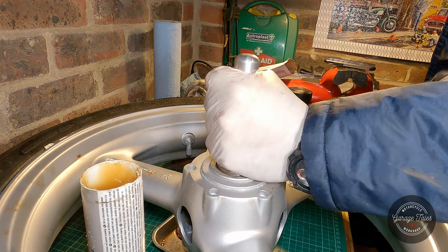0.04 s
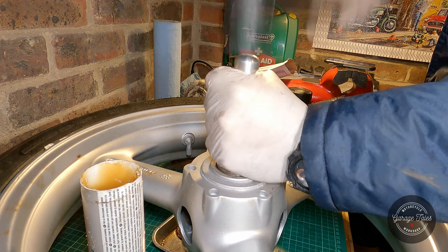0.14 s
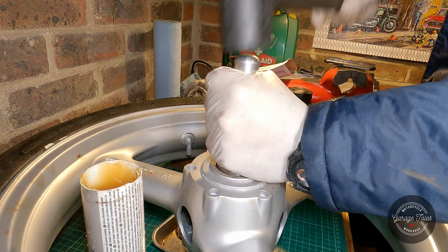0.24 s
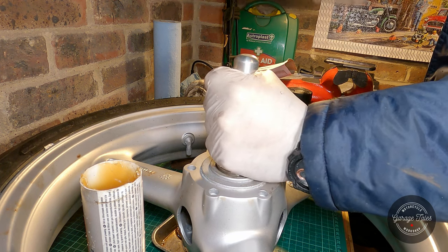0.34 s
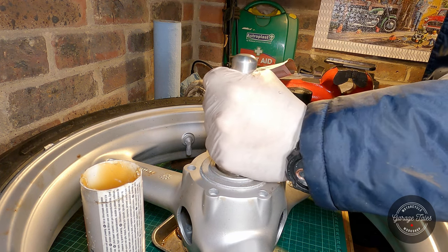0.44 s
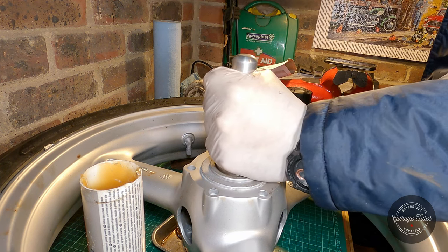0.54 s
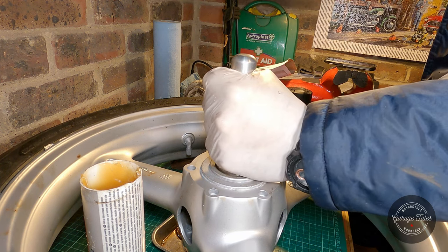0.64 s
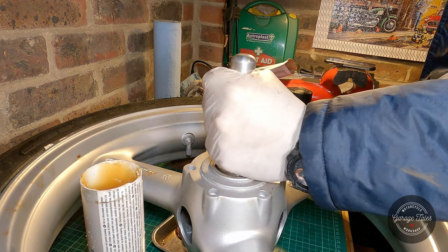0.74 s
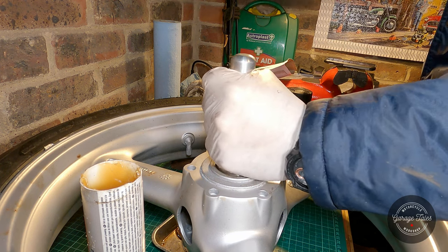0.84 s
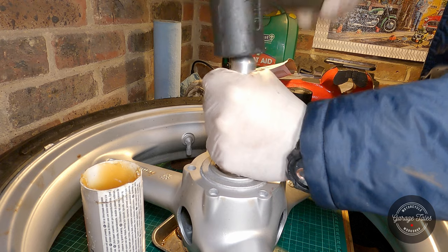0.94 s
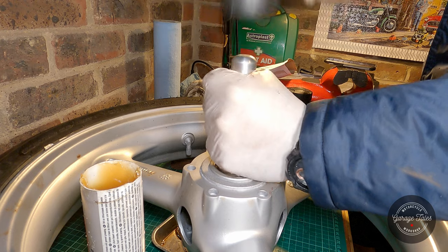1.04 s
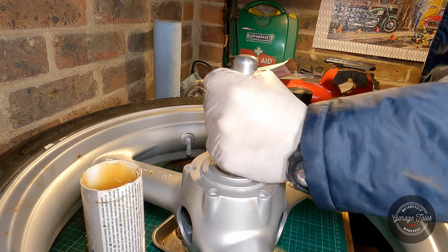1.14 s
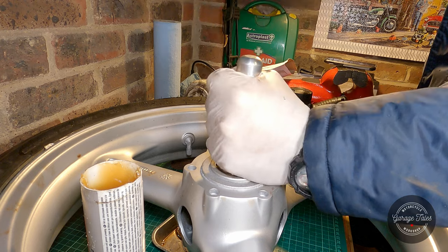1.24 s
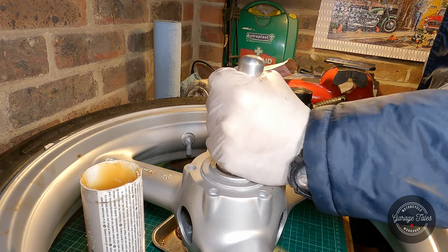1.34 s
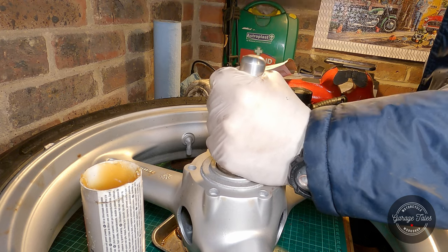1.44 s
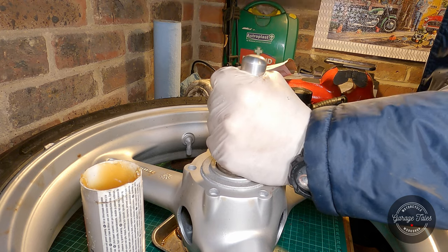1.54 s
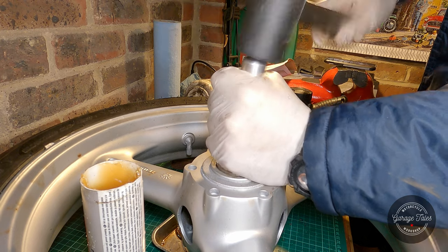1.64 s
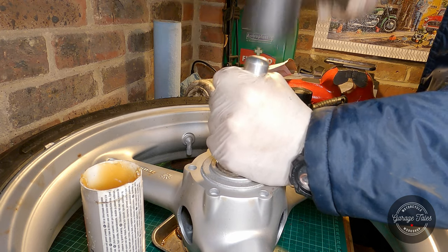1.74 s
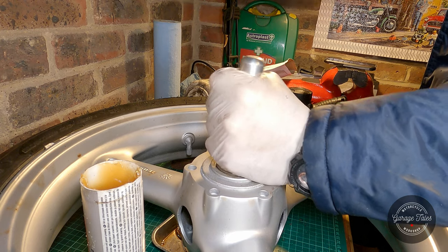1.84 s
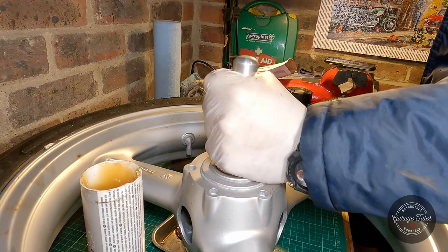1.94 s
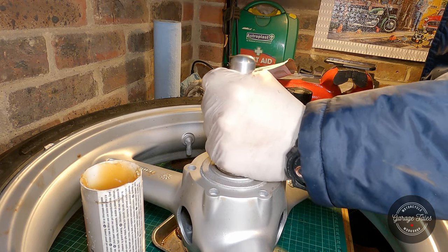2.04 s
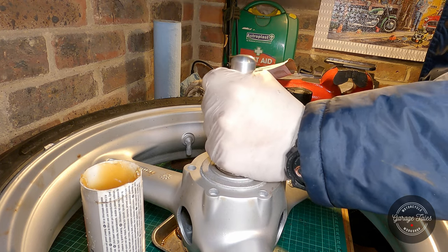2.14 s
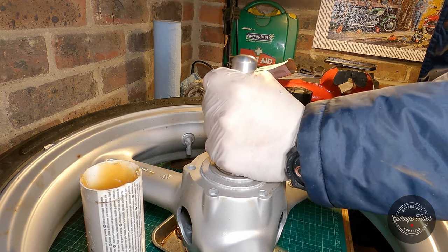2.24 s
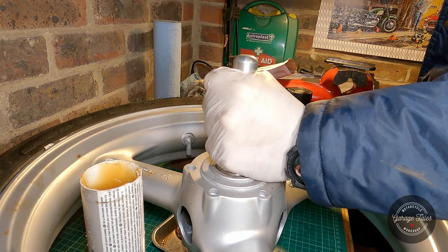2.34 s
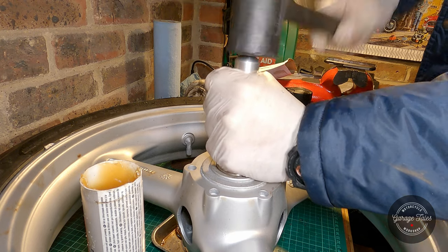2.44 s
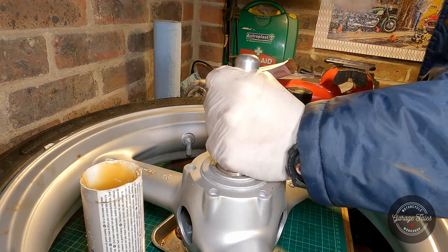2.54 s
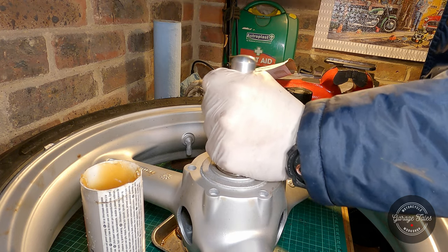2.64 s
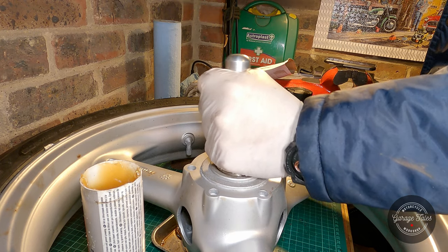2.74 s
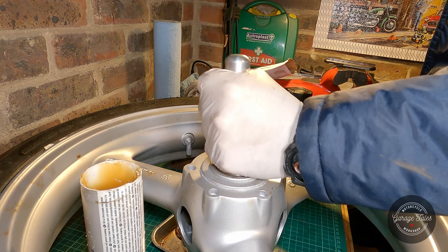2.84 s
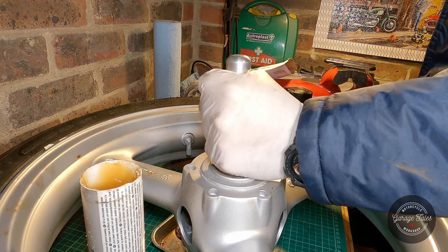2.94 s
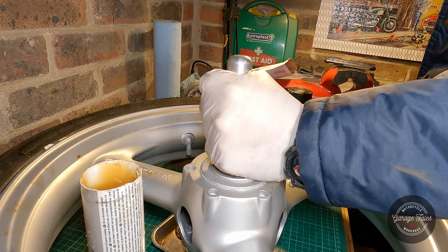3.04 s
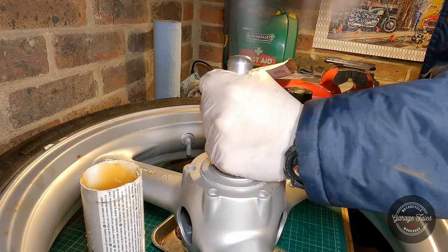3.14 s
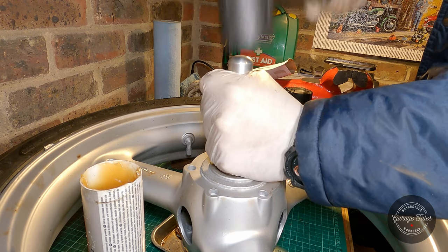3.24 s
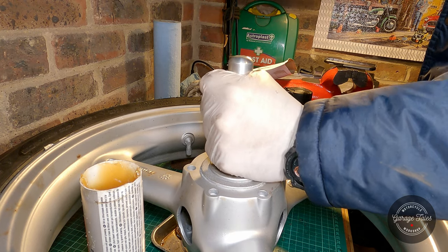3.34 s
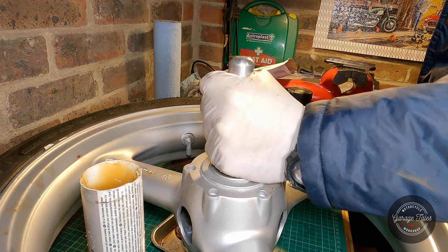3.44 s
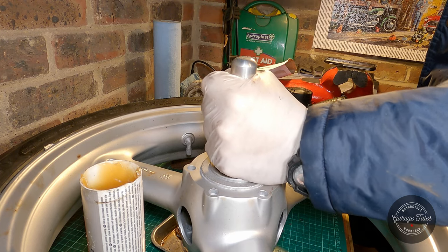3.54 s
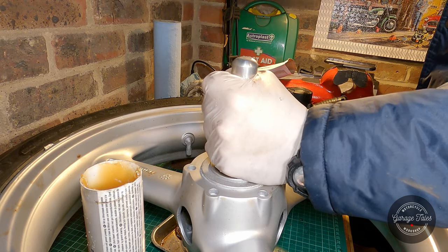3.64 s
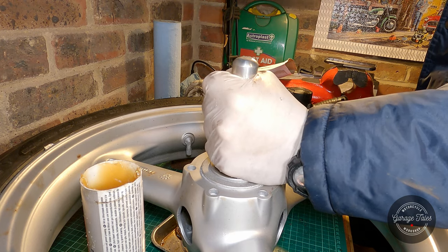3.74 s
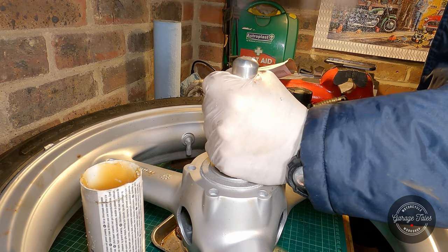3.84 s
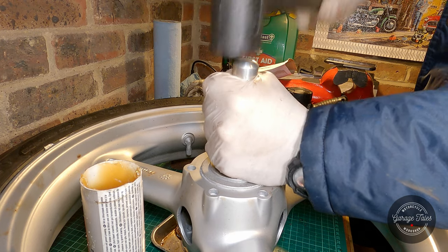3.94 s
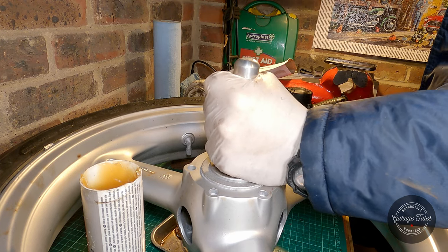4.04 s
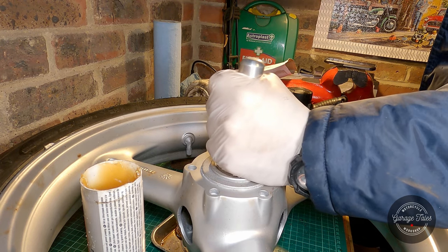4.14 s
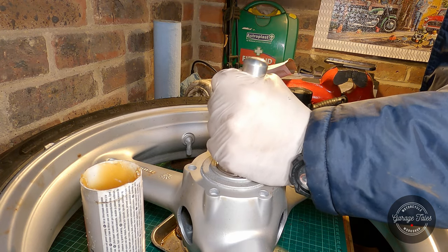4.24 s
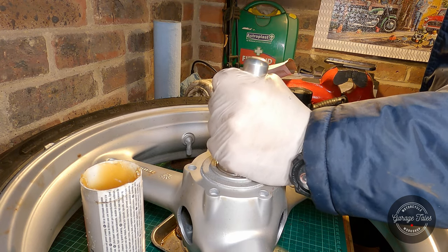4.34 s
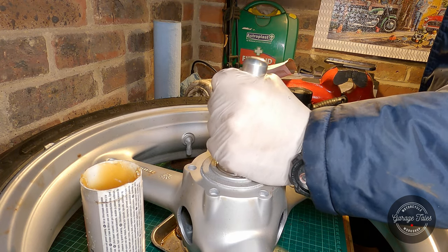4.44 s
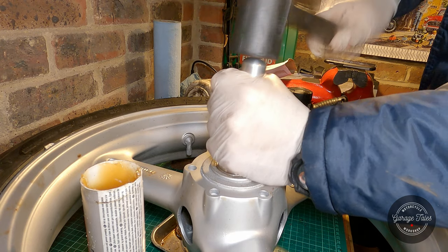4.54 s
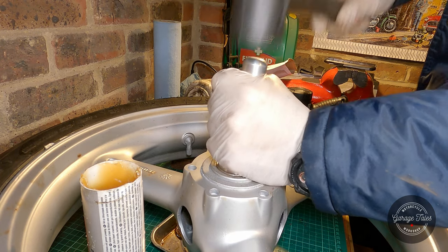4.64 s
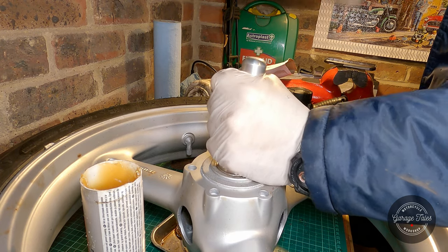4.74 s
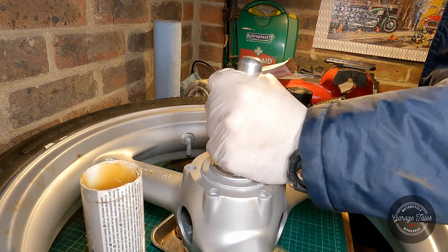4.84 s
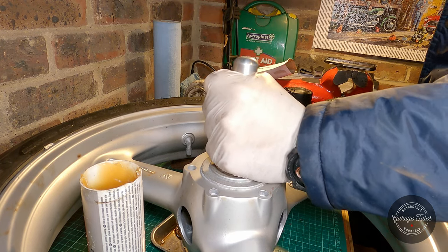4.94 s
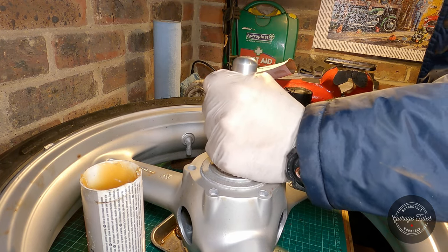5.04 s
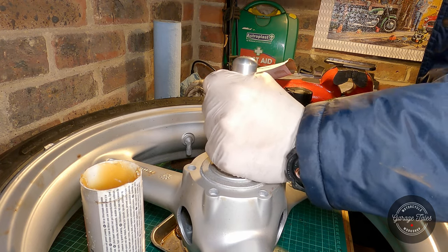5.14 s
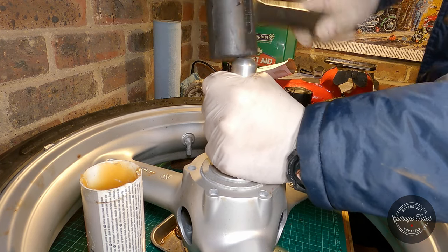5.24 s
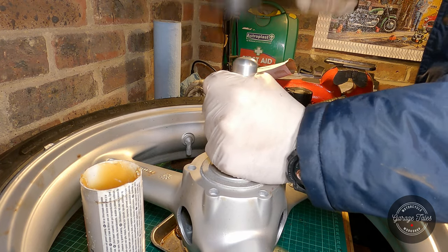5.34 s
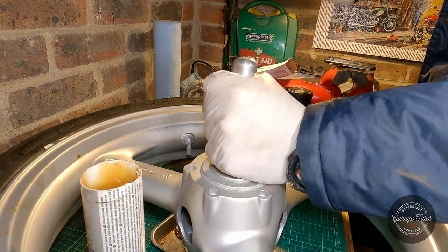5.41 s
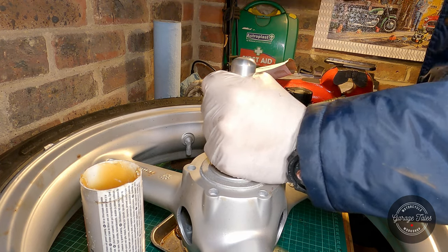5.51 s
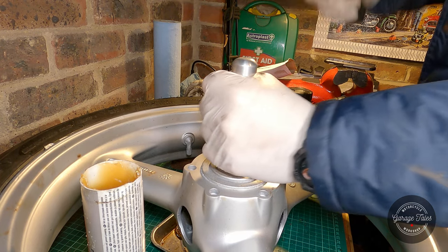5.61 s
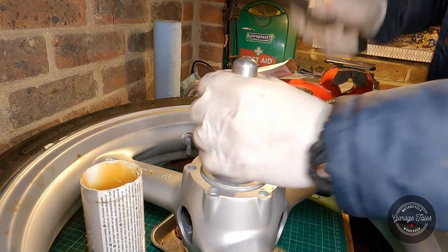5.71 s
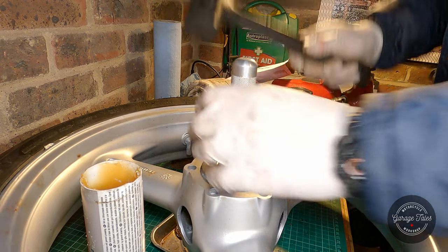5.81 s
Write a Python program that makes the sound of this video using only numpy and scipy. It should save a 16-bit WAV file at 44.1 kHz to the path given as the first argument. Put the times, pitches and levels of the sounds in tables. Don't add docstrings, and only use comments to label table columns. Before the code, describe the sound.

In a small brick garage, a mallet hits a steel driver over a wheel hub eight times, about three-quarters of a second apart. Each blow is a sharp crack with a hard knock, low bench thump, slight rim ring and short room echo. A nylon sleeve swishes before and after the blows, small parts tick, and a faint machine hums. The close, almost mono microphone clips the peaks; at the end only rustling and light ticks remain.

```python
import sys
import numpy as np
from scipy import signal
from scipy.fft import rfft, irfft
from scipy.io import wavfile
from scipy.ndimage import uniform_filter1d

SR = 44100
rng = np.random.default_rng(int(sys.argv[2]) if len(sys.argv) > 2 else 0)


def invert_db(level):
    return 10 ** (np.asarray(level, dtype=float) / 20)


def wav_record(signal):
    frames = np.transpose(np.atleast_2d(signal))
    bounded = np.clip(frames, -1, 1)
    quanta = np.round(bounded * 32767).astype(np.int16)
    wavfile.write(sys.argv[1], SR, quanta)


N = 258901


def unit(x):
    return x / np.sqrt(np.mean(x ** 2) + 1e-20)


def along(points, hz):
    f, v = np.transpose(points)
    return np.interp(np.log(hz + 1), np.log(f + 1), v)


def coloured(x, spectrum):
    slit_hz, slit_half_hz = 9080, 120
    hz = np.fft.rfftfreq(len(x), 1 / SR)
    inside = (hz > spectrum[0][0] / 2) & (hz < spectrum[-1][0] + 400)
    inside = inside & (np.abs(hz - slit_hz) > slit_half_hz)
    return irfft(rfft(x) * invert_db(along(spectrum, hz)) * inside, len(x))


def hiss(size, spectrum):
    return unit(coloured(rng.standard_normal(size), spectrum))


def ring(modes, t, attack, scatter_db, phase):
    tones = np.zeros(len(t))
    for hz, db, t60 in modes:
        level, shift, turn = rng.standard_normal(3)
        pitch = hz * (1 + 0.0028 * shift * scatter_db)
        fade = invert_db(db + scatter_db * level - 60 * t / t60)
        tones += fade * np.sin(2 * np.pi * pitch * t + phase * turn)
    return tones * (1 - np.exp(-t / attack))


def add(track, s, sound):
    part = track[round(s * SR):][:len(sound)]
    part += sound[:len(part)]


# (pitch [Hz], level per Hz [dB])
AIR_COLOUR = [(25, -24), (45, -24.5), (80, -9.5), (125, -16.5), (155, 4), (182, -11), (208, -2), (250, -17),
              (390, -13.5), (450, -20.5), (580, -12), (720, -20.5), (900, -25.5), (1500, -21.5),
              (9000, -48.5)]


def air():
    return invert_db(-65.5) * hiss(N, AIR_COLOUR)


# (pitch [Hz], level [dB])
MACHINE_TONES = [
    (154, -74),
    (208, -72),
]


def hum():
    t = np.arange(N) / SR
    out = np.zeros(N)
    for hz, db in MACHINE_TONES:
        drift = np.interp(6 * t, np.arange(40), rng.standard_normal(40))
        out += invert_db(db + 2.1 * drift) * np.sin(2 * np.pi * hz * t)
    return out


# (time [s], peak level [dB], pitch [Hz], time to fade 60 dB [s], overtone [dB])
PART_TICKS = [(0.034, -43, 1593, 0.032, -13), (0.098, -54, 1790, 0.03, 0), (0.438, -41, 1248, 0.058, -8),
              (1.244, -42.5, 3220, 0.048, -7), (1.308, -45.5, 1205, 0.03, -9),
              (1.338, -42.5, 920, 0.025, -6), (1.452, -39, 1250, 0.045, -19),
              (2.004, -45, 880, 0.029, -9.5), (2.741, -46.5, 1186, 0.04, -8.5),
              (3.533, -48, 1120, 0.057, -8), (5.698, -51.5, 1210, .04, -14), (5.792, -45, 1220, 0.02, -8),
              (5.795, -46, 625, 0.06, -17), (5.804, -43.5, 1323, 0.036, -13),
              (0.034, -43.5, 3220, 0.02, -17), (0.034, -46, 552, 0.044, -12),
              (1.245, -46, 4290, 0.048, -23.5), (1.245, -52, 2405, 0.027, -6),
              (5.858, -42.5, 991, 0.05, -7)]


def ticks():
    out, t = np.zeros(N), np.arange(4096) / SR
    for s, db, hz, t60, over_db in PART_TICKS:
        colour = [(hz / 3, -20), (hz, -2), (hz, over_db - 18), (hz * 1.54, over_db), (hz * 2.5, over_db - 28)]
        body = invert_db(-1) * hiss(len(t), colour) + invert_db(-3) * np.sin(2 * np.pi * hz * t)
        fade = invert_db(db - 4.5 - 60 * t / max(t60, .005))
        add(out, s - .0007, fade * body * (1 - np.exp(-t / 0.00034)))
    return out


# (pitch [Hz], level per Hz [dB])
NYLON_COLOUR = [(240, -42), (400, -8.5), (656, -11.5), (738, -14.5), (1080, 0.5), (1720, -2), (2380, 0),
                (3220, -0.5), (6850, -9.5), (8900, -21.5), (10200, -36), (19800, -120)]
# (pitch [Hz], level per Hz [dB])
CRISP_COLOUR = [(9100, -20), (9700, -11), (11600, 4), (12700, -6.5), (13200, -27.5)]
# (time [s], peak level [dB], length [s])
CUFF_FLICKS = [
    (1.7067, -39, 0.013),
    (2.46, -39, 0.014),
    (3.22, -35.5, 0.01587),
    (3.947, -35.5, 0.014),
]


def cuff():
    out, t = np.zeros(N), np.arange(4096) / SR
    brighter = [(hz, level + 4 * np.log2(hz / 3000)) for hz, level in NYLON_COLOUR[:-1]]
    for s, db, length in CUFF_FLICKS:
        cloth = hiss(len(t), brighter) + invert_db(-11.5) * hiss(len(t), CRISP_COLOUR)
        fade = invert_db(db - 13.5 - 60 * np.clip(t - length, 0, None) / 0.026)
        add(out, s - .0007, fade * cloth * (1 - np.exp(-t / 0.00062)))
    return out


def patchy(x, depth_db):
    z = signal.stft(x, nperseg=256)[2]
    field = uniform_filter1d(rng.standard_normal(z.shape), size=4, axis=0)
    field = uniform_filter1d(field, size=7, axis=1)
    return signal.istft(z * invert_db(depth_db * unit(field)), nperseg=256)[1][:len(x)]


def peak(t, db, rise_db_per_s, fall_db_per_s):
    return invert_db(2 * (db + np.minimum(rise_db_per_s * t, -fall_db_per_s * t)))


STRIKE_TIMES = [
    .2892,
    1.0179,
    1.7722,
    2.5314,
    3.2957,
    4.0097,
    4.6779,
    5.3463,
]
# (start before the blow [s], fastest before the blow [s], arm [dB], swish [dB])
ARM_DOWNSWINGS = [
    (0.24, .077, -53, -56),
    (0.21, 0.085, -57, -70.5),
    (0.262, .059, -60.5, -47.5),
    (0.26, .057, -56.5, -46.5),
    (0.25, 0.054, -58, -48),
    (0.23, 0.063, -56.5, -53),
    (0.26, .074, -58, -51.5),
    (.15, .091, -60.5, -57.5),
]
# (recoil [dB], recoil peak after [s], recoil fade by 60 dB [s], lift [dB], lift length [s])
ARM_LIFTS = [
    (-48, 0.049, 0.32, -66.5, .55),
    (-42, 0.056, 0.27, -66, 0.59),
    (-42, 0.055, .3, -66.5, 0.52),
    (-44.5, .05, 0.33, -65.5, .55),
    (-44, .055, .3, -66, 0.512),
    (-43.5, .062, 0.23, -65, 0.42),
    (-45.5, .048, 0.37, -69.5, 0.45),
    (-52.5, 0.072, .33, -73.5, .31),
]
# (time [s], rustle [dB], time to fade 60 dB [s])
HAND_SHIFTS = [
    (.02, -63, 0.47),
    (.443, -62.5, 0.25),
    (1.25, -60, 0.061),
    (4.19, -64, 0.32),
    (5.699, -64.5, 0.99),
    (5.868, -57.5, .5),
]


def arm():
    still_db = -83
    lift_start_s, lift_rise_s, lift_fade_s = .12, 0.09, 0.084
    recoil_crisp_db, recoil_dulls_db_per_s = -19, 39.5
    t = np.arange(0, N, 32) / SR
    swing, swish, lift, recoil, recoil_crisp, shift = np.zeros((6, len(t)))
    for s, down, up in zip(STRIKE_TIMES, ARM_DOWNSWINGS, ARM_LIFTS):
        start, fastest, arm_db, swish_db = down
        recoil_db, top, t60, lift_db, length = up
        climb = (arm_db - still_db) / max(start - fastest, .01)
        swing += peak(t - s + fastest, arm_db, climb, 89)
        swish += peak(t - s + fastest, swish_db, 500, 547.5)
        after = np.clip(t - s, 0, None)
        recoil += (t > s) * peak(after - top, recoil_db, 200.5, 60 / t60)
        dulling = (60 / t60 + recoil_dulls_db_per_s) * (after - top)
        recoil_crisp += (t > s) * invert_db(2 * (recoil_db + recoil_crisp_db - dulling))
        rising = np.clip((after - lift_start_s) / lift_rise_s, 0, 1) ** 2
        fading = np.clip(after - length + lift_fade_s, 0, None) / lift_fade_s
        lift += rising * invert_db(2 * (lift_db - 12 * (after - 0.18) - 12.5 * fading))
    for s, db, t60 in HAND_SHIFTS:
        shift += peak(t - s, db, 180.5, 60 / t60)
    still = np.full(len(t), invert_db(2 * still_db))
    moves = np.array([swing, swish, lift, shift, still])
    crisp_share = invert_db(2 * np.array([-13.5, -10, -13, -21.5, -14]))
    rustle_power = moves.sum(axis=0) + recoil
    crisp_power = crisp_share @ moves + recoil_crisp
    return [np.interp(np.arange(N) / SR, t, np.sqrt(power)) for power in (rustle_power, crisp_power)]


def sleeve():
    rustle, crispness = arm()
    grain_db = unit(uniform_filter1d(rng.standard_normal(N), size=120))
    rub = invert_db(grain_db) * rng.standard_normal((2, N))
    weave = unit(coloured(patchy(rub[0], depth_db=2), NYLON_COLOUR))
    crisp = unit(coloured(patchy(rub[1], depth_db=3), CRISP_COLOUR))
    return invert_db(0.5) * rustle * weave + crispness * crisp


# (pitch [Hz], level per Hz [dB])
LEAK_COLOUR = [(200, -30), (420, -3.5), (600, -4), (900, -5.5), (1300, -14.5), (2500, -29.5), (3900, -30.5),
               (4400, -17), (4900, -31.5), (8200, -37), (8900, -31.5), (9400, -53.5)]


def leak(t):
    steps = np.floor(t * SR / 512) * 512 / SR
    fall = uniform_filter1d(invert_db(-24 * steps / .04 - 24 * t / .04), size=40)
    return (fall * hiss(len(t), LEAK_COLOUR))[::-1]


# (pitch [Hz], level per Hz [dB])
ECHO_COLOUR = [(40, -32), (80, -2.5), (200, 3), (330, -5), (420, -5), (600, -6.5), (700, -13), (790, -18.5),
               (1500, -22), (3000, -20.5), (6000, -30.5), (9000, -50.5), (11500, -46.5), (12800, -55.5)]
# (pitch [Hz], time to fade 60 dB [s])
GARAGE_FADE = [(60, 0.3), (150, 0.49), (400, 0.52), (650, 0.51), (850, 0.44), (3000, 0.34), (8000, 0.26)]


def echo(t):
    hz, when, z = signal.stft(hiss(len(t), ECHO_COLOUR), SR, nperseg=1024)
    fade = invert_db(-60 * when / along(GARAGE_FADE, hz)[:, None])
    tail = signal.istft(z * fade, SR, nperseg=1024)[1][:len(t)]
    return invert_db(-18.5) * tail * (1 - np.exp(-t / 0.009))


# (pitch [Hz], level [dB], time to fade 60 dB [s])
BENCH_TONES = [(57, -11.5, 0.72), (79.5, 3, 0.37), (124.3, -7.5, 0.52), (153.4, -3.5, 0.48),
               (176.4, 0.5, 0.22), (203.6, -7, 0.16), (247, 0, .28), (305, -4, 0.29)]


def bench(t):
    return invert_db(-21) * ring(BENCH_TONES, t, 0.0073, scatter_db=1.5, phase=3)


# (pitch [Hz], level [dB], time to fade 60 dB [s])
RIM_TONES = [(2250, -2, 0.4), (2250, 0, .16), (1177, -15.5, .3), (3545, -19.5, 0.14), (4430, -20.5, 0.14),
             (5150, -23, 0.067)]


def rim(t, db, ring_db):
    tone = invert_db(ring_db - 26) * ring(RIM_TONES, t, 0.003, scatter_db=0, phase=.1)
    note_db = db + ring_db - 29 - 60 * t / RIM_TONES[0][2]
    faded = invert_db(-64) / invert_db(note_db)
    return tone / (1 + faded ** 4)


# (time [s], level [dB], time to fade 60 dB [s])
RIM_NUDGES = [
    (5.794, -55.5, 0.14),
    (5.858, -60, 0.11),
]


def nudges():
    out, t = np.zeros(N), np.arange(4096) / SR
    for s, db, t60 in RIM_NUDGES:
        add(out, s, invert_db(db) * ring([(RIM_TONES[0][0], 0, t60)], t, 0.00091, scatter_db=3.5, phase=1))
    return out


# (pitch [Hz], level [dB], time to fade 60 dB [s])
HUB_TONES = [(414.3, -4.5, 0.11), (551, -0.5, .08), (618, 0.5, 0.061), (647, -7, .05), (872, -11.5, 0.049)]


def hub(t):
    return invert_db(-9) * ring(HUB_TONES, t, 0.00044, scatter_db=2.5, phase=1.3)


# (pitch [Hz], level [dB], time to fade 60 dB [s])
DRIVER_TONES = [(1038, -5.5, 0.039), (1250, -1.5, 0.036), (1533, -5, 0.027), (1700, -5, .015),
                (2493, -2, 0.021), (3500, -8, 0.015), (4440, -2.5, .018), (4980, -8.5, 0.021),
                (6970, -16, .014)]
# (pitch [Hz], level per Hz [dB])
CRACK_COLOUR = [(180, -33), (400, -6.5), (900, 3), (1500, -4.5), (2400, -2.5), (3000, -6), (4300, -2.5),
                (6500, -17), (8500, -25.5), (11500, -24), (13200, -28.5), (16000, -37)]


def driver(t, shank_db, shoulder_db, tip_db, edge_db):
    weight = [(1250, shank_db), (2100, shoulder_db), (4400, tip_db), (11000, edge_db)]
    modes = [(hz, db + along(weight, hz), t60) for hz, db, t60 in DRIVER_TONES]
    colour = [(hz, db + along(weight, hz)) for hz, db in CRACK_COLOUR]
    contact_s = .0025
    pressed = invert_db(-6 * t / contact_s - 40 * np.clip(t / contact_s - 1, 0, None))
    crack = invert_db(-4.5) * pressed * hiss(len(t), colour)
    chatter = invert_db(-11.5 - 60 * t / 0.047) * hiss(len(t), colour[:-2] + [(12800, -51.5)])
    grip = 0.36 + 0.55 * pressed
    steel = invert_db(10) * grip * ring(modes, t, 0.000078, scatter_db=1.05, phase=1.5)
    return steel + crack + chatter


# (strength [dB], hub knock [dB], bench thump [dB], rim ring [dB], early leak [dB])
MALLET_BLOWS = [
    (-5.5, -0.9, -2, -7, -1.5),
    (-6, 1, -0.85, 3, -3.5),
    (-7.5, 0.5, -0.1, 0.5, -2.5),
    (-7, -4.5, 0, -3, -1.5),
    (-6.5, 0, -2, -4, -2),
    (-6.5, 0.1, -0.5, -1.5, 0.5),
    (-7.5, 1, -1.5, 6, 1.5),
    (-9, 1.24, -2, 5.5, -2),
]
# (shank [dB], shoulder [dB], tip [dB], edge [dB])
MALLET_LANDINGS = [
    (-11.5, -14.5, -17, -20),
    (-14, -14, -15.5, -13.5),
    (-14.5, -9, -12, -7.5),
    (-15, -11.5, -12.5, -9),
    (-13.5, -9.5, -14.5, -20),
    (-15.5, -12, -10.5, -9.5),
    (-10.5, -18, -11.5, -12.5),
    (-7.5, -20, -10, -14.5),
]


def mallet():
    out, t = np.zeros(N), np.arange(32768) / SR
    half = t[:len(t) // 2]
    for s, blow, landing in zip(STRIKE_TIMES, MALLET_BLOWS, MALLET_LANDINGS):
        db, knock_db, thump_db, ring_db, leak_db = blow
        low = invert_db(thump_db) * (bench(t) + echo(t))
        add(out, s, invert_db(db) * low * np.clip((t[-1] - t) / .1, 0, 1))
        add(out, s, invert_db(db) * (invert_db(knock_db) * hub(half) + rim(half, db, ring_db)))
        add(out, s, invert_db(db) * driver(t[:4096], *landing))
        add(out, s - 2048 / SR, invert_db(db - 15 + leak_db) * leak(t[:2048]))
    return out


# (pitch [Hz], side below middle [dB])
SIDE_COLOUR = [(1000, -46), (3500, -34), (6500, -33), (9300, -20), (11000, -12), (12300, -5), (13300, -8),
               (16000, -12)]


def scene():
    mono = air() + hum() + ticks() + cuff() + sleeve() + nudges() + mallet()
    side = coloured(np.roll(mono, 11) - .6 * mono, SIDE_COLOUR)
    return np.array([mono + side, mono - side])


def top_cut(x):
    return signal.sosfilt(signal.butter(12, 16800, fs=SR, output="sos"), x)


def record(dry):
    x = signal.sosfilt(signal.butter(2, 50, "high", fs=SR, output="sos"), dry)
    x = x / (1 + np.abs(x / .58) ** 8) ** (1 / 8)
    x = signal.sosfilt(signal.butter(10, 15100, fs=SR, output="sos"), x)
    return top_cut(x)


dry = scene()
out = record(dry)
wav_record(out)
```